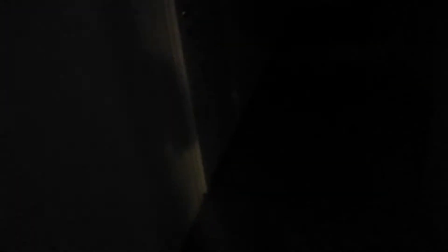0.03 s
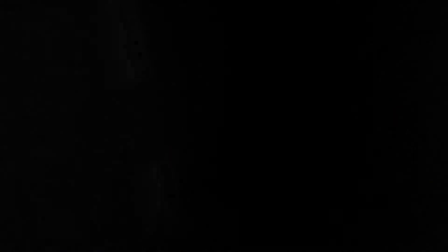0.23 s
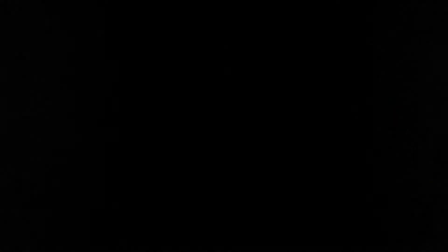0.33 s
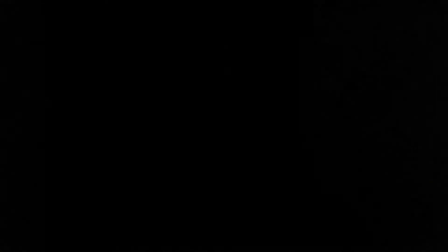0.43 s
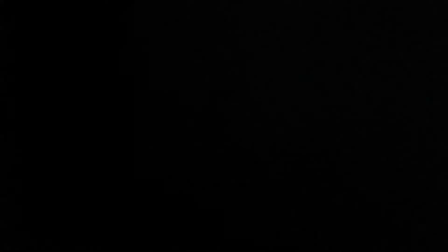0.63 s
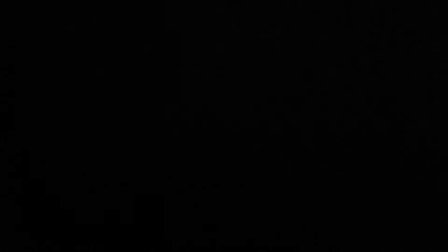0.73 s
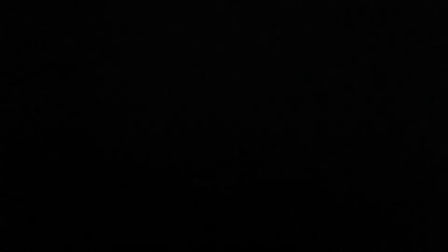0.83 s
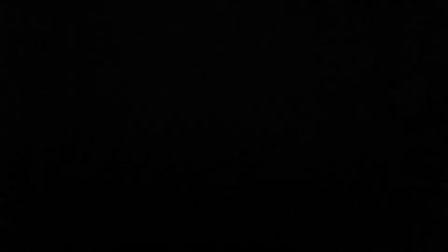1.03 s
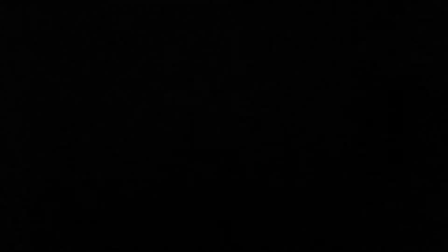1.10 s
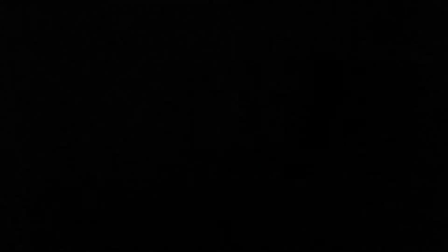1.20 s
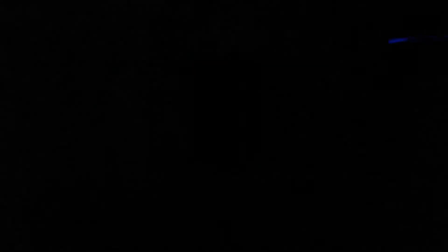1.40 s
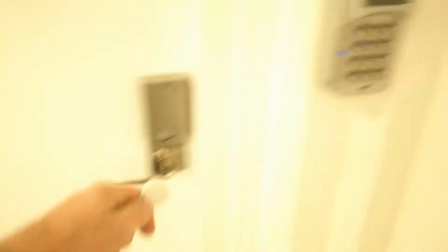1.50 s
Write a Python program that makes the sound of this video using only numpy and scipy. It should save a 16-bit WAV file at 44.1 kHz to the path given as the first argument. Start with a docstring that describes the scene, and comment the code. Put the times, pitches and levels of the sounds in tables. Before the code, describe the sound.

Heavy door swinging shut with a loud, rattling slam that rings through a stairwell.

```python
"""A heavy door slams in a hard-walled stairwell, heard from a spaced microphone pair close to the walls,
with the door to the right. Over the building's rumble the leaf swings, its hardware ringing faintly, and
pushes air ahead. The latch touches, the leaf hits the frame and chatters in it, loose latch metal buzzes,
and the stairwell rings on. A scuff, a thin squeak, a faint bump and some rustling follow."""
import sys
import numpy as np
from scipy import signal
from scipy.fft import rfft, irfft
from scipy.io import wavfile

SR = 44100
rng = np.random.default_rng(int(sys.argv[2]) if len(sys.argv) > 2 else 0)


def digitize_waveform(pressure):
    """Quantize a signal to 16-bit integers and store it at the path in sys.argv[1].

    Rows of a 2-D input are taken as channels; values are limited to [-1, 1].
    """
    field = np.atleast_2d(pressure).T
    bounded = np.clip(field, -1, 1)
    quanta = np.round(bounded * 32767).astype(np.int16)
    wavfile.write(sys.argv[1], SR, quanta)


N = 68355
T = np.arange(N) / SR
EDGES_HZ = np.concatenate([[18, 45, 90, 140], np.geomspace(200, 17500, 21)])
CENTRES_HZ = np.sqrt(EDGES_HZ[1:] * EDGES_HZ[:-1])

# at the microphone pair: f/Hz, left-right correlation
CORRELATION = [(125, 0.99), (250, 1), (500, 0.34), (1000, 0.1), (16000, 0.049)]
# f/Hz, left minus right/dB
BALANCE = [(250, 0), (600, -2), (1200, -3.5), (2500, -6), (6000, -7), (9000, 3.5), (11000, 9), (14000, -11)]
# f/Hz, delay of the left side/s
LEFT_LAG = [(40, .00015), (250, 0.00025), (700, .00058)]
# spectra of the noisy sounds: f/Hz, relative density/dB
RUMBLE_COLOUR = [(25, -1), (60, -9), (98, 0.5), (150, -25.5), (300, -22), (600, -28.5), (1300, -24),
                 (3000, -29.5), (6000, -31.5), (10000, -44.5), (16000, -48)]
SWING_COLOUR = [(60, -25.5), (250, -8), (600, -9.5), (1200, -2.5), (2000, 0.5), (3000, 0), (5000, 3),
                (8000, -12), (10200, -9), (13000, -20), (16000, -26.5)]
AIR_COLOUR = [(25, -1), (60, -7), (120, -12), (300, -18.5), (1000, -48)]
DOOR_COLOUR = [(30, -6.5), (70, -9.5), (150, -4.5), (230, 3), (400, 1.5), (560, -7), (1100, 2.5), (2400, 0),
               (4500, -6.5), (7000, -9.5), (8600, -13), (11500, -7.5), (16000, -15)]
STAIRWELL_COLOUR = [(30, 6.5), (70, 2.5), (140, -4), (260, 3), (400, 5), (560, -5.5), (1100, 2.5),
                    (2800, -2.5), (4500, -5.5), (7000, -10), (8600, -15), (11500, -10), (16000, -22)]
SCUFF_COLOUR = [(100, -10), (500, -4.5), (1300, 2.5), (2500, 0.5), (4200, 5), (6500, 0.5), (9000, -7),
                (12000, -8), (16000, -15)]
SQUEAK_COLOUR = [(2500, -32), (3400, 7), (4200, 3.5), (5200, -12), (9000, -20), (16000, -27)]
RUSTLE_COLOUR = [(200, -13), (1200, -6), (3500, 5), (7000, 1.5), (11000, 2), (16000, -7)]
# swells of rubbing or moving air: peak t/s, level/dB, rise/s, t60/s
SWING = [(.005, -47, .05, 0.68), (.16, -57.5, 0.057, 0.48)]
AIR_PUSH = [(0.211, -39, 0.016, 0.25)]
SCUFFS = [(.78, -44.5, .009, 0.37), (0.813, -45, 0.015, 0.4)]
SQUEAK = [(0.979, -57, 0.0031, 0.25)]
RUSTLES = [(1.33, -74.5, 0.0078, 0.37), (1.381, -72, 0.0036, 0.14), (1.454, -72, 0.02, 0.31),
           (1.482, -70, .003, .1)]
# resonances of the swinging leaf's hardware: f/Hz, width/Hz, level/dB
HARDWARE_RINGS = [(2340, 120, -58.5), (3681, 100, -61), (5200, 98, -56), (7470, 170, -58.5),
                  (10150, 210, -58)]
# leaf and latch strike the frame: t/s, bass/dB, middle/dB, presence/dB, treble/dB
BLOWS = [(.190, -34.5, -35, -26, -24.5), (0.2113, 1, 4, 0, 1), (0.2145, 3, 2, 0.5, -3),
         (0.2219, -5.5, -13.5, -18.5, -2.5), (0.2638, -20.5, -20.5, -13, -6.5),
         (0.2677, -19.5, -14.5, -1.5, -2), (0.28, -16, -11, -3, -6), (0.288, -12, -16, 0.5, -0.5),
         (.311, -1.5, -0.5, -4.5, 1), (.323, 1, -1.5, -5, -2.5), (.334, -8.5, -15, -4.5, -4),
         (0.37, -20, -14, -11, -5), (0.493, -14, -10.5, -19.5, -16.5), (0.602, -24, -27, -29.5, -30)]
# where those four ranges lie: f/Hz
BLOW_RANGES_HZ = [250, 1000, 3500, 11000]
# the direct sound's place, on top of BALANCE: f/Hz, left minus right/dB
DOOR_SIDE = [(300, 3.5), (600, -4.5), (1200, -3), (2500, -1), (10000, -1)]
# decay of the dense rings: f/Hz, t60/s
DOOR_T60 = [(40, 0.067), (250, 0.08), (1000, 0.071), (4000, 0.059), (14000, .05)]
STAIRWELL_T60 = [(35, 1.9), (120, 1.11), (350, 1.19), (1200, 1.258), (3000, 1.165), (5500, 0.91),
                 (9000, 0.62), (15000, 0.54)]
# modes of leaf, latch and loose latch metal: f/Hz, relative level/dB, t60/s
LEAF_MODES = [(36.7, -40.5, 1.4), (95.7, -46, 1.6), (120.8, -39, 1.3), (167, -30.5, 0.077),
              (221.4, -31, .6), (251.5, -28, 0.18), (314.8, -43, .8), (340.3, -37.5, .7),
              (940, -34.5, 0.18), (1190, -29, .14), (1735, -40, 0.2)]
LATCH_MODES = [(2332, -37, .5), (2761, -39.5, 0.46), (2634, -30.5, 0.59), (3050, -36.5, .3), (3280, -45, 1),
               (4860, -49.5, .5)]
BUZZ_MODES = [(2790, -5, 0.089), (3014, -5.5, 0.038), (3325, -4.5, 0.024), (4266, -7.5, 0.0069),
              (5790, -3, 0.02), (7300, -1.5, 0.0079), (10000, -7, 0.01), (11610, -5, .014),
              (13800, -9.5, 0.0043)]
# the slam's level dips as it fades: t/s, gain/dB
LEVEL_DIP = [(.9, 0), (1.0, -7), (1.15, -7), (1.5, -3)]
# faint touches: t/s, level/dB, top f/Hz
BUMPS = [(1.277, -64, 2380), (1.288, -61, 1406)]


def from_db(db):
    """Decibels to gain."""
    return 10 ** (np.asarray(db) / 20)


def at_hz(points, hz=CENTRES_HZ):
    """Read a table on a log-frequency axis."""
    f, value = np.transpose(points)
    return np.interp(np.log(hz), np.log(f), value)


def dying(t, t60):
    """Holds at 1 until t = 0, then loses 60 dB in t60."""
    return np.exp(-np.log(1000) * np.maximum(t, 0) / t60)


def pan(db):
    """Left and right gains, db apart, at constant total power."""
    gains = from_db([[db / 2], [-db / 2]])
    return gains / np.sqrt(np.mean(gains ** 2))


def noise_bands():
    """Noise as a spaced microphone pair hears it, alike in the bass: bands x 2 x N."""
    bands = []
    white = rng.standard_normal((2, 2, N + SR // 10))
    for k, (alike, side_db) in enumerate(zip(at_hz(CORRELATION), at_hz(BALANCE))):
        sos = signal.butter(3, EDGES_HZ[k:k + 2], "band", fs=SR, output="sos")
        pair = signal.sosfilt(sos, white[k % 2])[:, -N:]
        shares = np.sqrt([(1 + alike) / 2, (1 - alike) / 2])
        mid, side = pair * (shares / pair.std(axis=1))[:, None]
        bands.append(pan(side_db) * np.array([mid + side, mid - side]))
    return np.array(bands)


def band_gains(colour):
    """Gain per band for a spectrum, total power 1."""
    gains = from_db(at_hz(colour)) * np.sqrt(np.diff(EDGES_HZ))
    return gains / np.sqrt(np.sum(gains ** 2))


def coloured(bands, colour):
    """Mix the bands to a spectrum, reversed so that it is unrelated to the stairwell's ring."""
    return np.tensordot(band_gains(colour), bands, 1)[:, ::-1]


def rumble(bands, level_db=-70.5):
    """Room tone: the building's steady low noise."""
    return from_db(level_db) * coloured(bands, RUMBLE_COLOUR)


def swells(bands, rows, colour):
    """Rubbing or moving air: noise that swells and dies away in the stairwell."""
    power = 0
    for peak_s, db, rise_s, t60 in rows:
        rise = np.exp(-.5 * (np.minimum(T - peak_s, 0) / rise_s) ** 2)
        power += (from_db(db) * rise * dying(T - peak_s, t60)) ** 2
    return np.sqrt(power) * coloured(bands, colour)


def hardware_rings(t60=.8):
    """The swing rubs narrow resonances of the leaf's hardware, which fade."""
    out = 0
    for hz, width_hz, db in HARDWARE_RINGS:
        resonance = signal.iirpeak(hz, hz / width_hz, fs=SR)
        rubbed = signal.lfilter(*resonance, rng.standard_normal((2, N)))
        out += from_db(db) * pan(at_hz(BALANCE, hz)) * rubbed / rubbed.std()
    return out * dying(T, t60)


def blows_at(hz):
    """Each blow's starting sample and its strength at one frequency."""
    return [(int(s * SR), from_db(np.interp(np.log(hz), np.log(BLOW_RANGES_HZ), levels_db)))
            for s, *levels_db in BLOWS]


def dense_ring(bands, colour, t60s, rise_s):
    """Each blow sets off countless modes, which build up, then die at their own rate in each band."""
    out = 0
    build = 1 - np.exp(-T / rise_s)
    for hz, gain, band in zip(CENTRES_HZ, band_gains(colour), bands):
        answer = (build * dying(T, at_hz(t60s, hz))) ** 2
        power = np.zeros(N)
        for start, strength in blows_at(hz):
            power[start:] += strength ** 2 * answer[:N - start]
        out += gain * np.sqrt(power) * band
    return out


def door_crack(bands, gain_db=-10, contact_s=.00092):
    """Direct sound: the short crack of leaf on frame, from the right above the bass."""
    sides = np.array([pan(db) for db in at_hz(DOOR_SIDE)])
    direct = sides * np.roll(bands, N // 2, axis=2)  # shifted to be unrelated to the stairwell's ring
    return from_db(gain_db) * dense_ring(direct, DOOR_COLOUR, DOOR_T60, contact_s)


def stairwell(bands, gain_db=-26):
    """The hard walls' long answer to each blow."""
    return from_db(gain_db) * dense_ring(bands, STAIRWELL_COLOUR, STAIRWELL_T60, rise_s=.014)


def ring(clicks, hz, t60):
    """One mode: a unit click sets a sine of height 1 ringing."""
    radius = from_db(-60 / (t60 * SR))
    angle = 2 * np.pi * hz / SR
    return signal.lfilter([np.sin(angle)], [1, -2 * radius * np.cos(angle), radius ** 2], clicks + 1e-18)


def leaf_and_latch_modes():
    """Single modes, struck by every blow, stand out of the dense ring."""
    out = 0
    for hz, db, t60 in LEAF_MODES + LATCH_MODES:
        clicks = np.zeros(N)
        for start, strength in blows_at(hz):
            clicks[start] -= strength
        out += from_db(db) * pan(at_hz(BALANCE, hz)) * ring(clicks, hz, t60)
    return out


def latch_buzz(start_s=.2625, fade_from_s=.325, touches_per_s=1200, level_db=-25.5):
    """After the rebound, loose latch metal strikes its resonances in rapid, uneven touches."""
    touches = rng.random(N) < touches_per_s / SR
    effort = (T > start_s) * dying(T - fade_from_s, t60=.065)
    out = 0
    for hz, db, t60 in BUZZ_MODES:
        clicks = touches * effort * rng.uniform(-.91, 1, (2, N))
        out += from_db(db) * pan(at_hz(BALANCE, hz)) * ring(clicks, hz, t60)
    active_rms = np.sqrt(np.sum(out ** 2) / (2 * np.sum(effort ** 2)))
    return from_db(level_db) * out / active_rms


def bump(bands, t60=.064):
    """Dull, quickly damped touches with little above their top frequency."""
    out = 0
    for s, db, top_hz in BUMPS:
        rolloff_db = -10 * np.log10(1 + (CENTRES_HZ / top_hz) ** 8)
        dull_noise = coloured(bands, np.transpose([CENTRES_HZ, rolloff_db]))
        out += from_db(db) * (T > s) * dying(T - s, t60) * dull_noise
    return out


def at_microphones(sound, walls=4, echo_db=-16, delay_range_s=(.001, .006), corner_hz=1000):
    """Echoes off walls near the pair ripple the spectrum above the bass; the left side hears later."""
    hz = np.maximum(np.arange(N + 1) * SR / (2 * N), 1)
    gain = from_db(echo_db) * hz ** 2 / (hz ** 2 + corner_hz ** 2)
    delays_s = rng.uniform(*delay_range_s, (walls, 2, 1))
    echoes = np.exp(-2j * np.pi * hz * delays_s).sum(axis=0)
    ripple = (1 + gain * echoes) / np.sqrt(1 + walls * gain ** 2)
    lag = np.exp(-2j * np.pi * hz * at_hz(LEFT_LAG, hz) * [[1], [0]])
    return irfft(rfft(sound, 2 * N) * lag * ripple)[:, :N]


def scene():
    """Over the building's rumble: the swing, the slam and the small sounds after it."""
    bands = noise_bands()
    swing = swells(bands, SWING, SWING_COLOUR) + hardware_rings() + swells(bands, AIR_PUSH, AIR_COLOUR)
    slam = door_crack(bands) + stairwell(bands) + leaf_and_latch_modes() + latch_buzz()
    dip = from_db(np.interp(T, *np.transpose(LEVEL_DIP)))
    scuff = swells(bands, SCUFFS, SCUFF_COLOUR)
    squeak = swells(bands, SQUEAK, SQUEAK_COLOUR)
    rustle = swells(bands, RUSTLES, RUSTLE_COLOUR)
    return at_microphones(rumble(bands) + swing + slam * dip + scuff + squeak + bump(bands) + rustle)


def record(dry, overload=3.3, cutoff_hz=16000):
    """The highest peaks are rounded and the top is cut."""
    lowpass = signal.ellip(10, .2, 80, cutoff_hz, fs=SR, output="sos")
    return signal.sosfilt(lowpass, overload * np.tanh(dry / overload))


dry = scene()
out = record(dry)
digitize_waveform(out)
```